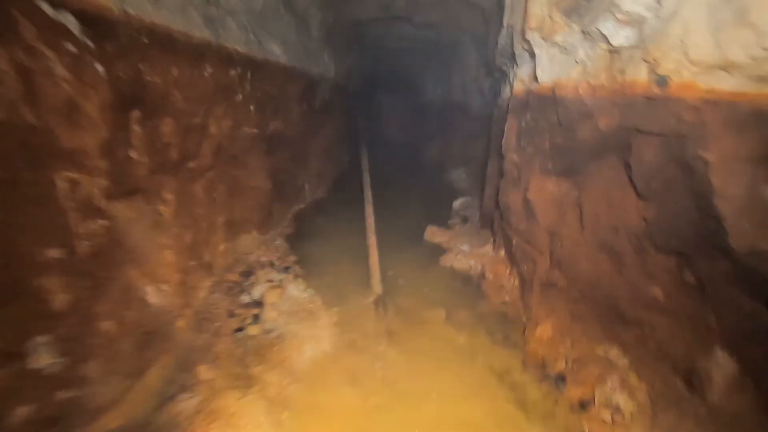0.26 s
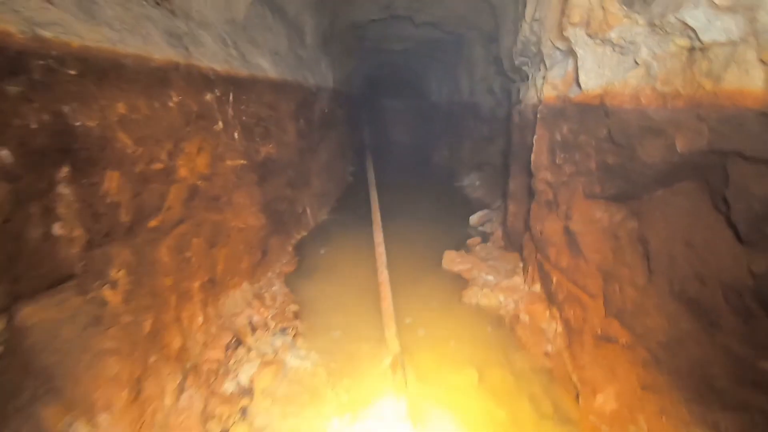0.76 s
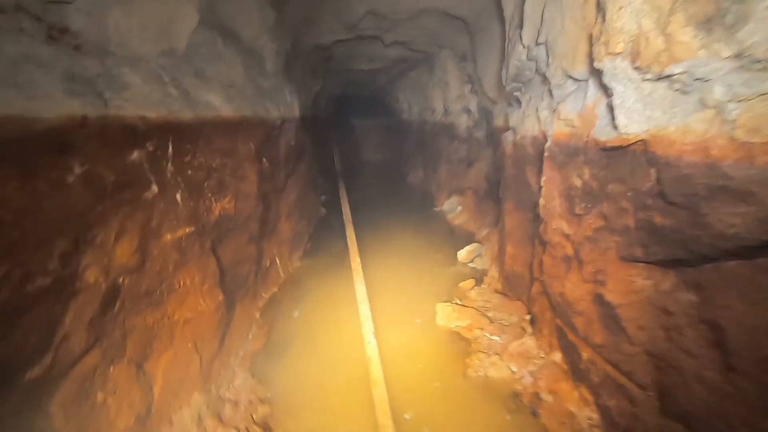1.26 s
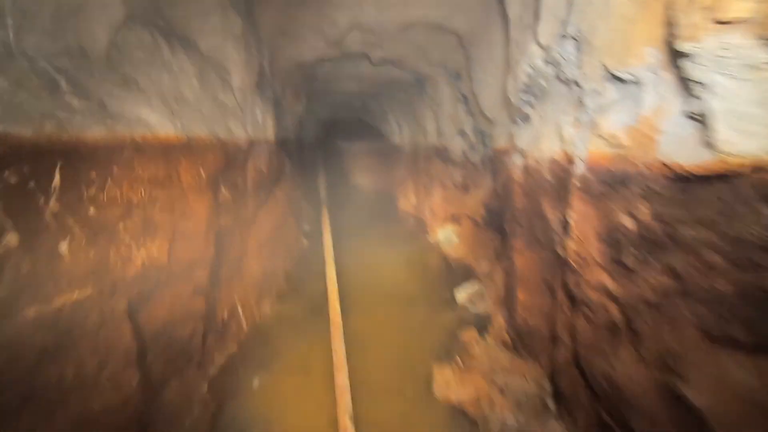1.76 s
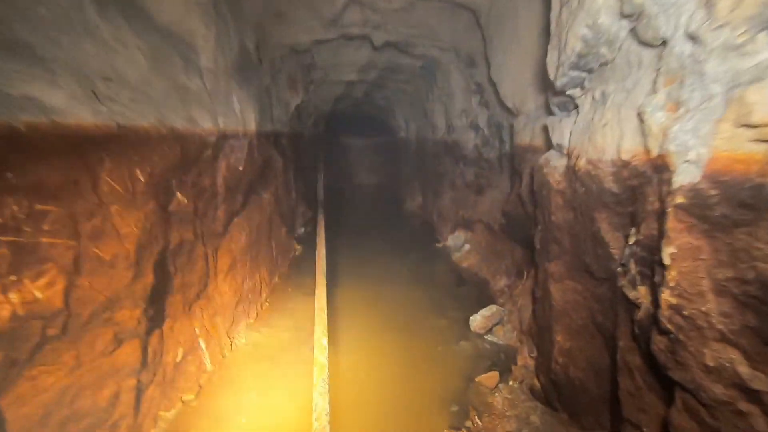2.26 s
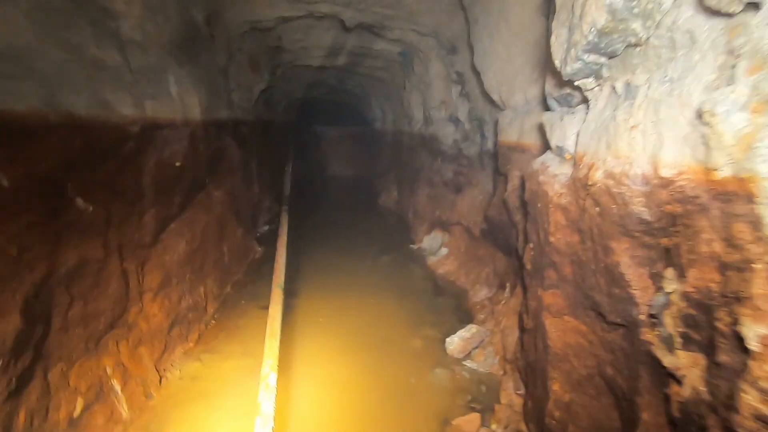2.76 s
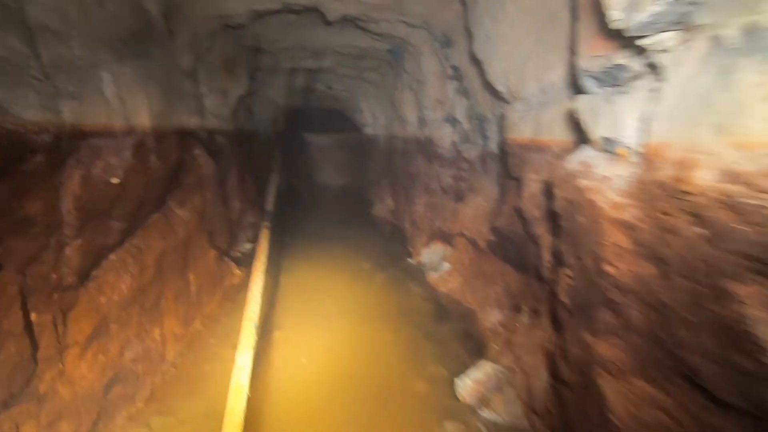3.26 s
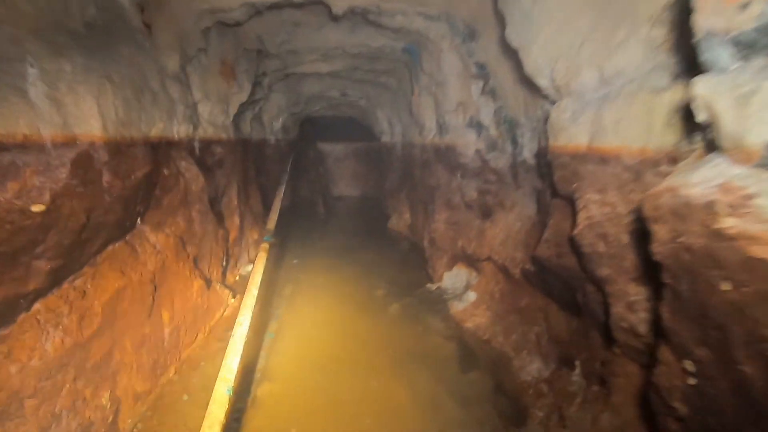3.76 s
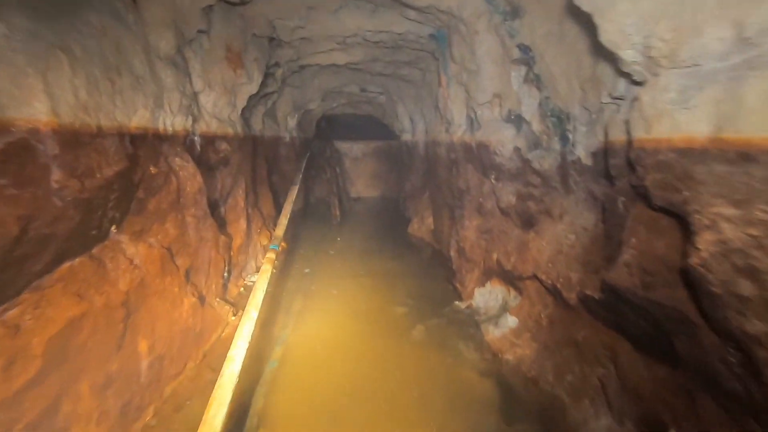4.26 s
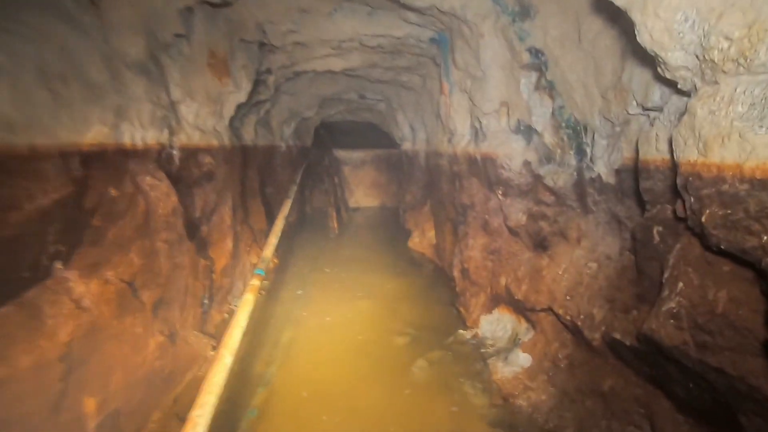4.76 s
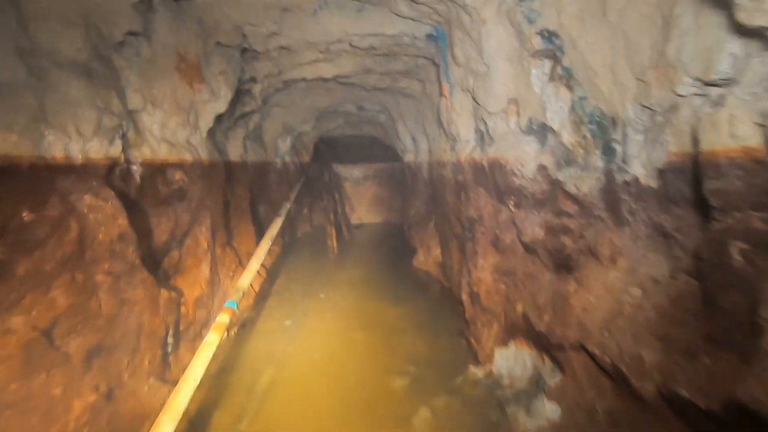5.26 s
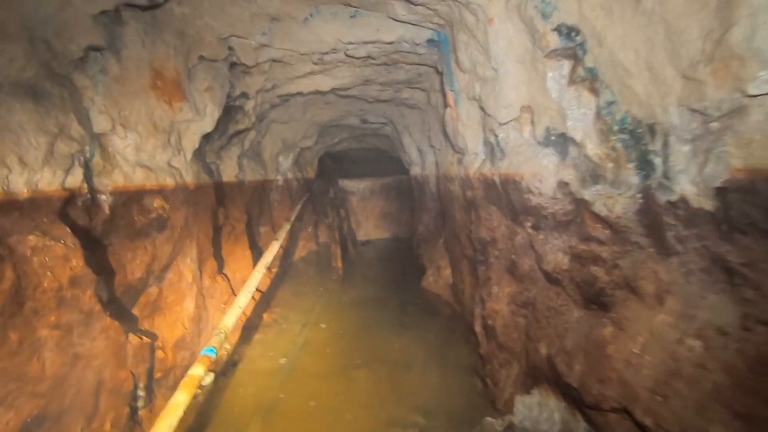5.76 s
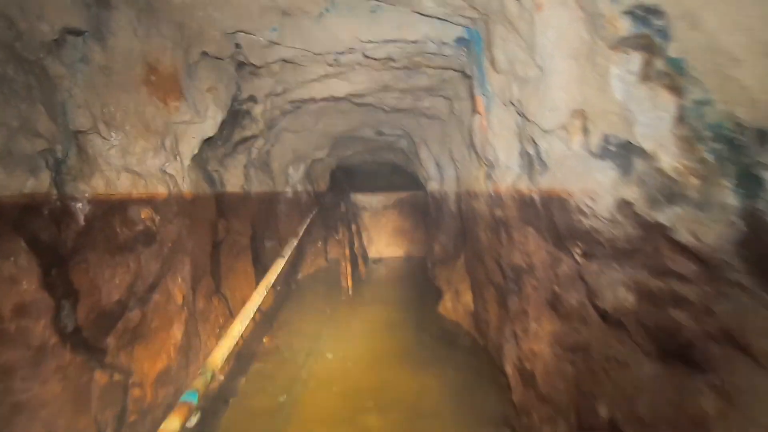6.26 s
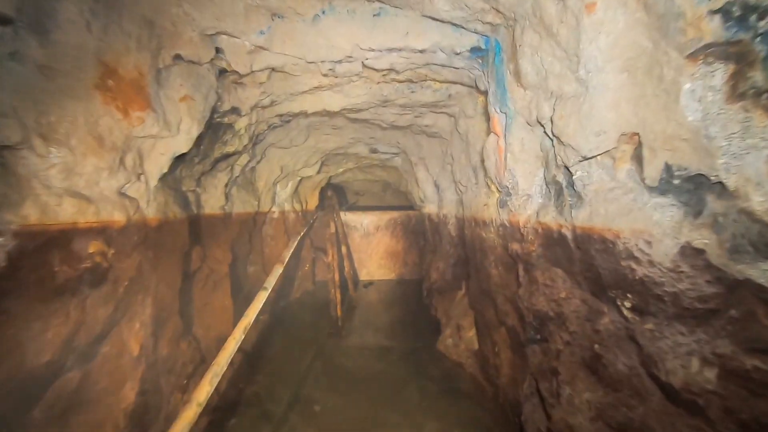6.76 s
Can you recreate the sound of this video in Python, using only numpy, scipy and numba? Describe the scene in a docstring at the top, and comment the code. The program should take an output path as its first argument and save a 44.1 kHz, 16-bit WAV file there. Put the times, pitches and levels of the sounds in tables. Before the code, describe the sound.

Wading in a narrow, reverberant rock tunnel, heard close and in stereo with crisp treble. At 0 s a strong low gurgling slosh and boom is already dying away, with quick splashes and spray at 0.2-0.4 s. Then it is nearly still: a few drips, a small splash at 1.1 s, and a splashy step with hissing spray around 1.7 s. At 2.4 s a bright, sharp drop leads a splash and fizzing wake. Spray and splashes return at 3.25 s, with a deep hollow plop and thud at 3.45 s. Spray rises near 4 s, a clear drop hits at 4.3 s, and a rounder plop comes at 4.5 s. From there to 5.9 s sloshes, gurgles and spray overlap almost continuously. It eases around 6.2-6.4 s, then glugging plops at 6.6-6.8 s and a wash of spray near 6.85 s close it. Soft low booms and faint air lie beneath.

```python
"""Boots wade through shallow water in a narrow rock tunnel, heard in stereo through a coloured microphone.
Wakes and spray are swarms of tiny damped chirps, one per bubble, under drawn swells and fades; splashes are
bursts of such bubbles, plops low ones, plips long-ringing ones, and single drops tick on the surface.
Low tunnel modes boom as resonated noise, shaped noise is the quiet air, and dense noise tails are the echoes."""
import sys
import numpy as np
from scipy import signal
from scipy.fft import rfft, irfft, next_fast_len
from scipy.io import wavfile
from scipy.ndimage import map_coordinates
from numba import njit

SR = 44100
rng = np.random.default_rng(int(sys.argv[2]) if len(sys.argv) > 2 else 0)


def output_pcm(signal):
    """Save a mono or channel-first signal as 16-bit PCM at the path in sys.argv[1].

    Samples are clipped to [-1, 1] before scaling.
    """
    pcm = np.clip(np.atleast_2d(signal).T, -1, 1) * 32767
    wavfile.write(sys.argv[1], SR, np.round(pcm).astype(np.int16))


def boost_factor(decibels):
    """Convert a level in decibels to a linear amplitude factor."""
    exponent = np.asarray(decibels, float) / 20
    return 10 ** exponent


N = 308700  # samples: 7 s

# left-right likeness of echoes, boom and quiet air: (frequency [Hz], correlation [-1 to 1])
LIKENESS = [(40, .78), (100, .72), (180, .97), (350, .95), (700, .5), (1400, -.05), (2800, .4),
            (6000, -.05), (12000, -.2)]


def unit(x):
    """Scaled to rms 1."""
    return x / np.sqrt(np.mean(x ** 2) + 1e-20)


def along(points, hz):
    """Reads a curve of (Hz, value) points on a log frequency axis."""
    f, v = np.transpose(points)
    return np.interp(np.log(hz + 1), np.log(f + 1), v)


def filtered(x, response):
    """Applies a complex response of frequency to x."""
    m = next_fast_len(x.shape[-1] + SR // 4)
    spectrum = rfft(x, m) * response(np.fft.rfftfreq(m, 1 / SR))
    return irfft(spectrum, m)[..., :x.shape[-1]]


def paired(two, likeness):
    """Mixes two unrelated signals into a left and right of the given correlation."""
    def mid_side_gains(hz):
        angle = np.arccos(np.clip(along(likeness, hz), -1, 1)) / 2
        return np.array([np.cos(angle), np.sin(angle)])

    mid, side = filtered(two, mid_side_gains)
    return np.array([mid + side, mid - side])


def humps(s, db, swell, fade, bend):
    """Gain of each row, 20 dB down one swell before and one fade after its peak, and time since the peak.

    bend is the power of the curve: 1 pointed, 2 a dome. Both are read every 64 samples."""
    since = np.arange(0, N + 64, 64) / SR - s[:, None]
    before = -since / np.abs(swell)[..., None]
    after = since / np.abs(fade)[:, None]
    away = np.where(since < 0, before, after)
    return boost_factor(db[:, None] - 20 * away ** bend), since


def every_sample(coarse):
    """A control read every 64 samples, drawn out to every sample."""
    return np.interp(np.arange(N), np.arange(len(coarse)) * 64, coarse)


@njit
def chirps(start, step, life, size, rise, length):
    """Sum of damped sines swelling over their first cycle, pitch climbing by the share rise per life.

    start and life are in samples, step in radians a sample; life is the time to fall to 1/e."""
    out = np.zeros(length)
    for k in range(len(start)):
        for i in range(min(int(4 * life[k]), length - start[k])):
            u = i / life[k]
            swell = min(1., i * step[k] / (2 * np.pi))
            phase = step[k] * i * (1 + rise * u / 2)
            out[start[k] + i] += size[k] * swell * np.exp(-u) * np.sin(phase)
    return out


def bubbles(s, hz, db, cycles, rise):
    """Bubbles that decay over some cycles, their pitch climbing as they near the surface."""
    hz = np.clip(hz, 60, SR / 3)
    start = np.clip(s * SR, 0, N).astype(np.int64)
    return chirps(start, 2 * np.pi * hz / SR, cycles * SR / hz, boost_factor(db), rise, N)


def swarm(count, centre_hz, octaves, cycles, scatter_db):
    """Random bubbles of rms 1: log-normal pitch about a moving centre, sizes spread evenly in dB."""
    when, size, pitch = rng.random(count), rng.random(count), rng.standard_normal(count)
    hz = centre_hz[(when * N).astype(int)] * 2 ** (octaves * pitch)
    return unit(bubbles(when * N / SR, hz, -scatter_db * size, cycles, rise=0.13))


def clumps():
    """Water leaves the boot in clumps: a smooth random wander with a new value every 2500 samples."""
    return map_coordinates(rng.standard_normal(N // 2500 + 4), [np.arange(N) / 2500])


def wakes(surge):
    """Wakes folding behind a leg: gurgling bubbles that grow lower, joined by froth and glugs."""
    # each wake at its peak: (time [s], level [dB], pitch [Hz], swell over 20 dB [s], fade over 20 dB [s])
    wake_rows = [(0.0, -31, 650, .05, 0.023), (1.781, -49, 952, 0.24, 0.037), (2.53, -37, 1130, 0.08, 0.21),
                 (2.67, -48, 886, 0.11, 0.076), (3.45, -36, 1148, 0.078, 0.14),
                 (4.17, -47, 1060, 0.19, 0.19), (4.423, -36.5, 1553, 0.0205, 0.11),
                 (4.548, -36.5, 860, 0.18, 0.33), (4.941, -39, 1330, 0.082, 0.099),
                 (5.08, -34, 1110, 0.13, 0.094), (5.41, -39, 1250, 0.029, 0.11),
                 (5.499, -35, 877, 0.12, 0.13), (5.801, -42.5, 916, 0.22, 0.116),
                 (6.2, -47, 1020, 0.4, 0.19), (6.38, -46.5, 962, 0.1, 0.64),
                 (6.5, -43.5, 1370, 0.09, 0.075), (6.577, -37, 651, 0.038, 0.16),
                 (6.81, -40, 802, 0.14, 0.13), (6.96, -41, 1190, 0.082, 0.095)]
    sag_octaves_per_s, froth_s = 1.7, 0.35  # froth and glugs come in over froth_s, centred on the peak

    s, db, hz, swell, fade = np.transpose(wake_rows)
    wake, since = humps(s, db, swell, fade, bend=1.42)
    power = wake ** 2 + 1e-20
    # the strongest wake of the moment rules the pitch and the froth
    sagging_hz = hz[:, None] * 2 ** (-sag_octaves_per_s * np.clip(since, -.5, .5))
    slosh_hz = every_sample((power * sagging_hz).sum(0) / power.sum(0))
    breaking = np.clip(since / froth_s + .5, 0, 1)
    broken = every_sample((power * breaking).sum(0) / power.sum(0))

    gurgle = swarm(count=3500, centre_hz=slosh_hz, octaves=.36, cycles=3.5, scatter_db=21)
    # froth of smaller bubbles, glugs of bigger ones
    froth = swarm(count=9000, centre_hz=1.898 * slosh_hz, octaves=0.543, cycles=2.5, scatter_db=24)
    glugs = swarm(count=1500, centre_hz=0.551 * slosh_hz, octaves=0.31, cycles=2.9, scatter_db=7.5)
    slosh = gurgle + broken * (boost_factor(-4) * froth + boost_factor(-8.5) * glugs)
    return every_sample(np.linalg.norm(wake, axis=0)) * boost_factor(2.0 * surge) * slosh


def sprays(surge):
    """Sheets of spray thrown by a swinging boot: a dense swarm of very short, high bubbles."""
    # each sheet at its peak: (time [s], level [dB], swell over 20 dB [s], fade over 20 dB [s])
    spray_rows = [(0.0, -42, .05, 0.1), (0.19, -33.5, 0.017, 0.016), (0.255, -60, 0.047, 0.19),
                  (0.41, -47.5, 0.35, 0.069), (1.08, -54, 0.52, 0.22), (1.727, -36.5, 0.093, 0.19),
                  (2.454, -36, 0.075, 0.28), (3.02, -57.5, 0.26, 0.12), (3.16, -45.5, 0.069, 0.13),
                  (3.248, -37, 0.051, 0.29), (3.469, -35.5, 0.069, 0.1), (3.66, -52, .1, 0.21),
                  (3.976, -40.5, 0.031, 0.37), (4.38, -48, 0.5, 0.034), (4.56, -53.5, 0.25, 0.8),
                  (4.72, -43.5, 0.44, 0.63), (4.85, -34.5, 0.12, 0.33), (5.03, -39.5, 0.06, 0.38),
                  (5.66, -41.5, 0.21, 0.33), (5.75, -37, 0.17, 0.12), (5.885, -38.5, 0.15, 0.15),
                  (6.13, -41, 0.32, 0.13), (6.34, -48.5, 0.16, 0.16), (6.63, -46.5, 0.18, 0.18),
                  (6.85, -34.5, 0.25, 0.34)]
    sheet, _ = humps(*np.transpose(spray_rows), bend=1.005)
    droplets = swarm(count=18000, centre_hz=np.full(N, 3400.), octaves=0.953, cycles=1.3, scatter_db=14.0)
    return every_sample(np.linalg.norm(sheet, axis=0)) * boost_factor(2.3 * surge) * droplets


def mode_noise(modes):
    """Stereo noise of rms 1 through parallel resonances of alternating sign."""
    def response(f):
        total = 0
        for k, (centre, width, db) in enumerate(modes):
            resonance = 1j * f * width / (centre * centre - f * f + 1j * f * width)
            total = total + (-1) ** k * boost_factor(db) * resonance
        return total

    return unit(paired(filtered(rng.standard_normal((2, N)), response), LIKENESS))


def boom():
    """Body motion and sloshing feed the tunnel's deepest modes; heavy footfalls set the upper ones going."""
    # tunnel modes: (centre [Hz], width [Hz], relative level [dB])
    deep_modes = [(37.3, 14.7, 4), (72.9, 6.1, 1.5), (95.7, 9.7, -10)]
    upper_modes = [(152.6, 23.5, -0.5), (231, 121, -5)]
    # level of the deepest modes: (time [s], level [dB])
    rumble_points = [(0.0, -11.5), (0.13, -30.5), (0.23, -19), (0.8, -38), (1.3, -42.5), (1.75, -40),
                     (2.3, -39), (2.5, -33), (2.8, -39.5), (3.23, -41.5), (3.8, -30), (4.0, -41.5),
                     (4.33, -29), (4.42, -38.5), (4.8, -33), (6.3, -49), (6.65, -35.5), (6.9, -55)]
    # heavy footfalls: (time of peak [s], level [dB], fade over 20 dB [s])
    thud_rows = [(0.0, -28, 0.8), (0.23, -32.5, 0.44), (0.97, -42, 1), (1.75, -36.5, 0.86),
                 (3.47, -34, 0.4), (4.33, -52, 1), (5.13, -40.5, 0.72), (6.28, -46.5, 0.54)]

    rumble_s, rumble_db = np.transpose(rumble_points)
    deep_db = np.interp(np.arange(N) / SR, rumble_s, rumble_db)
    s, db, fade = np.transpose(thud_rows)
    thud, _ = humps(s, db, 0.12, fade, bend=1.0)  # every thud swells over 0.12 s
    thud_gain = every_sample(np.linalg.norm(thud, axis=0))
    return boost_factor(deep_db) * mode_noise(deep_modes) + thud_gain * mode_noise(upper_modes)


def still():
    """Far trickle and air of the quiet tunnel: steady noise of a fixed spectrum."""
    # spectrum of the quiet tunnel: (frequency [Hz], relative level per Hz [dB])
    air_curve = [(59, -21), (100, -4), (227, 8), (304, -20), (399, -42), (1140, -39), (10700, -20),
                 (15000, -74)]
    noise = filtered(rng.standard_normal((2, N)), lambda hz: boost_factor(along(air_curve, hz)))
    return boost_factor(-61.0) * unit(paired(noise, LIKENESS))


def plops():
    """Large air pockets closing behind a boot ring low for a few cycles."""
    # pockets: (time [s], relative level [dB], pitch [Hz])
    pocket_rows = [(0.033, -19, 161), (0.252, -26.5, 214), (0.954, -26.5, 199), (1.169, -27, 229),
                   (1.753, -30.5, 294), (2.612, -28, 205), (3.474, -13, 176.7), (4.511, -15.5, 378),
                   (5.087, -30, 288), (5.789, -26, 495), (6.572, -18.5, 534), (6.684, -28, 324),
                   (6.8, -23.5, 336)]
    s, db, hz = np.transpose(pocket_rows)
    return bubbles(s, hz, db - 2.5, cycles=3, rise=0.03)


def drops():
    """Ticks of single drops striking the surface: the direct sound, and the share sent to the walls."""
    # drops: (time [s], relative level [dB], pitch [Hz], share sent to the walls over that level [dB])
    drop_rows = [(0.054, -9, 3700, -13), (0.069, -10, 2800, -18), (0.577, -28.5, 6100, 7),
                 (0.8636, -16.5, 5070, -11), (1.5345, -19, 4500, -13), (1.5348, -19.5, 1220, -16),
                 (1.581, -23, 3180, -8), (1.581, -29.5, 6500, 8), (1.606, -18, 4380, -3.5),
                 (1.98, -22, 3520, -12), (2.311, -24, 3370, -34), (2.395, -24, 6530, 6.5),
                 (2.43, 0.5, 6200, -6), (3.143, -24, 4150, 2), (4.281, -4.5, 2050, -15),
                 (5.535, -22, 5500, 7.5), (6.315, -23.5, 4300, 5), (6.342, -11, 6800, -2)]
    s, db, hz, echo_db = np.transpose(drop_rows)
    ticks = bubbles(s, hz, db - 9.0, cycles=0.92, rise=0.046)
    sent = bubbles(s, hz, db + echo_db, cycles=0.92, rise=0.046)
    return ticks, sent


def splashes():
    """One main bubble at the onset, smaller ones crowding after it, and a hiss of flung droplets."""
    # splashes: (time [s], relative level [dB], main pitch [Hz], relative hiss level [dB])
    splash_rows = [(0.174, -19, 736, -46), (0.188, -39, 2970, -30), (0.232, -20, 1600, -52),
                   (0.247, -22, 2960, -51), (0.365, -25, 2950, -54), (0.425, -28, 2830, -36.5),
                   (1.083, -18, 2340, -33), (1.653, -23, 2190, -26), (1.711, -32, 1210, -27),
                   (2.362, -40, 1850, -41), (2.424, -20, 2600, -35), (2.452, -21, 1460, -42),
                   (2.459, -13.5, 3070, -42), (3.254, -15, 1027, -40), (3.397, -21, 1270, -38),
                   (3.449, -32, 1410, -47), (3.951, -30, 2830, -27.5), (4.084, -22.5, 1170, -26.5),
                   (4.412, -21.5, 1770, -50), (4.448, -19, 810, -40), (4.507, -16.5, 767, -38.5),
                   (4.698, -21.5, 828, -40), (4.82, -25, 2280, -28), (4.918, -12.5, 1290, -36),
                   (5.052, -18, 995, -28), (5.435, -17, 1135, -37), (5.468, -14.5, 865, -37),
                   (5.51, -19, 796, -37), (5.667, -18.5, 722, -36), (5.749, -29, 855, -28.5),
                   (5.85, -27, 2400, -33), (6.099, -24, 1260, -40), (6.539, -17, 730, -49),
                   (6.797, -21, 1260, -29), (6.849, -17, 1415, -30), (6.911, -18, 1330, -42)]
    s, db, hz, hiss_db = np.transpose(splash_rows)[:, :, None]
    draws = rng.random((len(splash_rows), 30, 5))  # 30 small bubbles and 30 droplets a splash
    delay, pitch, size, fling, droplet_pitch = np.moveaxis(draws, 2, 0)

    main = bubbles(s.ravel(), hz.ravel(), db.ravel() - 0.5, cycles=2.13, rise=0.0045)

    crowd_s = s - .012 * np.log(1 - delay)  # arrivals thin out exponentially
    crowd_hz = hz * 2 ** (1.05 * (pitch - .55))
    crowd_db = db - 14.5 - 12 * size
    crowd = bubbles(crowd_s.ravel(), crowd_hz.ravel(), crowd_db.ravel(), cycles=2.79, rise=0.275)

    fling_s = s - .018 * np.log(1 - fling)
    fling_hz = 3500 * 2 ** (0.64 * droplet_pitch)
    fling_db = hiss_db + 16.5 - 9 * size
    hiss = bubbles(fling_s.ravel(), fling_hz.ravel(), fling_db.ravel(), cycles=0.29, rise=0.62)
    return main + crowd + hiss


def plips():
    """Lone bubbles that ring clearly for longer and climb a little in pitch."""
    # lone bubbles: (time [s], relative level [dB], pitch [Hz])
    plip_rows = [(0.698, -40.5, 1150), (1.783, -29, 880), (1.797, -30, 915), (1.091, -30.5, 2880),
                 (1.193, -37, 2490), (2.842, -39.5, 2860), (2.975, -43.5, 1450), (3.131, -40, 2640),
                 (3.454, -27.5, 587), (5.267, -36, 1970), (5.452, -28, 2080), (5.545, -32, 754),
                 (5.666, -31, 2900), (6.397, -32.5, 1390), (6.435, -39.5, 3800), (6.645, -45, 4660)]
    s, db, hz = np.transpose(plip_rows)
    return bubbles(s, hz, db, cycles=6.7, rise=0.03)


def tunnel(x):
    """Dense, smooth echoes of rough walls: seventeen noise tails in turn, a new one each tenth of a second."""
    # decay of the echoes: (frequency [Hz], time to fall 60 dB [s])
    decay_curve = [(100, 1.45), (260, 1.63), (700, 0.97), (1800, 0.79), (5000, 0.41), (12000, 0.61)]
    hop, span, count = SR // 10, SR, 17  # samples between tails, samples in a tail, tails
    age = np.arange(span) / SR
    # echoes gather fast; the near walls are strongest
    build = (1 - np.exp(-age / 0.00037)) * (1 + 2.13 * np.exp(-age / 0.006))
    hz, t, z = signal.stft(rng.standard_normal((count, 2, span)), SR, nperseg=256)
    decay = boost_factor(-60 * t / along(decay_curve, hz)[:, None])
    tails = build * signal.istft(z * decay, SR, nperseg=256)[1][..., :span]

    out = np.zeros((2, N + span + hop))
    for at in range(0, N, hop):
        tail = tails[at // hop % count]
        echo = signal.fftconvolve(x[None, at:at + hop], tail / np.linalg.norm(tail[0]), axes=1)
        out[:, at:at + echo.shape[1]] += echo
    return paired(out[:, :N], LIKENESS)


def scene():
    """Near water in the centre, its stronger echoes all round, the boom and the quiet tunnel."""
    surge = clumps()
    slosh, spray = wakes(surge), sprays(surge)
    pockets = plops()
    ticks, sent = drops()
    water = slosh + splashes() + plips()
    direct = boost_factor(-1.0) * water + boost_factor(3.5) * pockets + boost_factor(-1.5) * spray + ticks
    echoes = tunnel(water + boost_factor(-1.0) * pockets + spray + sent)
    return direct + boost_factor(5.5) * echoes + boom() + still()


def low_pass(x):
    """Removes everything above the highest recorded frequency."""
    return signal.sosfilt(signal.butter(12, 15100, fs=SR, output="sos"), x)


def record(dry):
    """Microphone colour, and a left-right lean that varies with frequency."""
    # microphone response: (frequency [Hz], gain [dB])
    mic_curve = [(24, -12), (38, -9.5), (300, -2), (1000, 2), (3000, 5.5), (7000, 6), (10200, 5.5),
                 (11000, -7), (14800, -7), (15400, -40), (16000, -92)]
    # lean to one side: (frequency [Hz], left minus right [dB])
    lean_curve = [(60, 1.8), (240, -0.8), (950, -2), (3770, -1.4), (13000, 2.2)]

    def ears(hz):
        lean_db = np.outer([.5, -.5], along(lean_curve, hz))
        return boost_factor(along(mic_curve, hz) + lean_db)

    return low_pass(filtered(dry, ears))


dry = scene()
out = record(dry)
output_pcm(out)
```